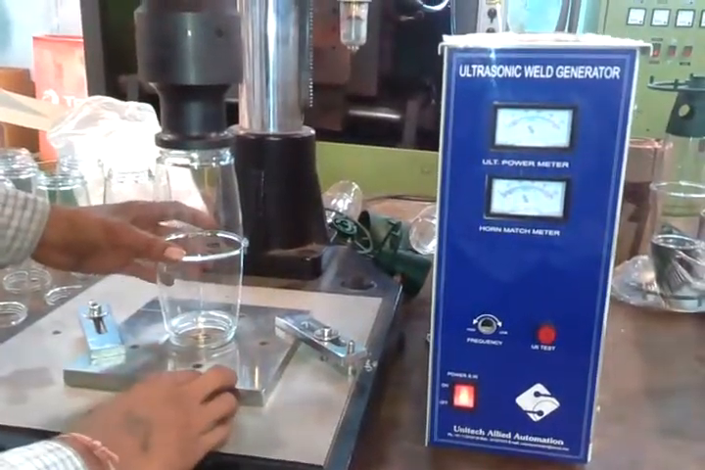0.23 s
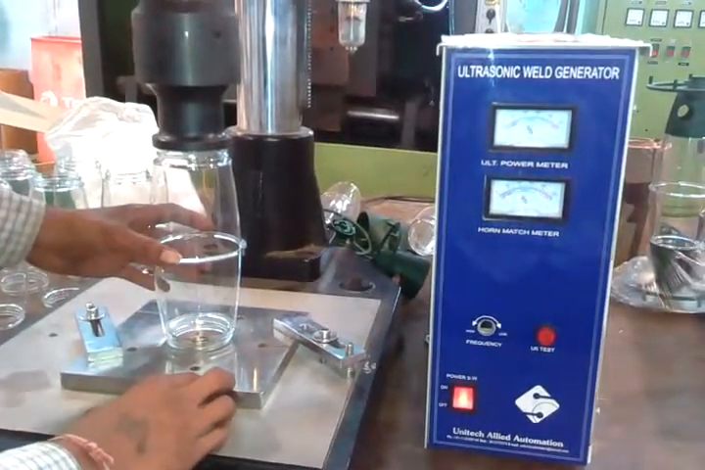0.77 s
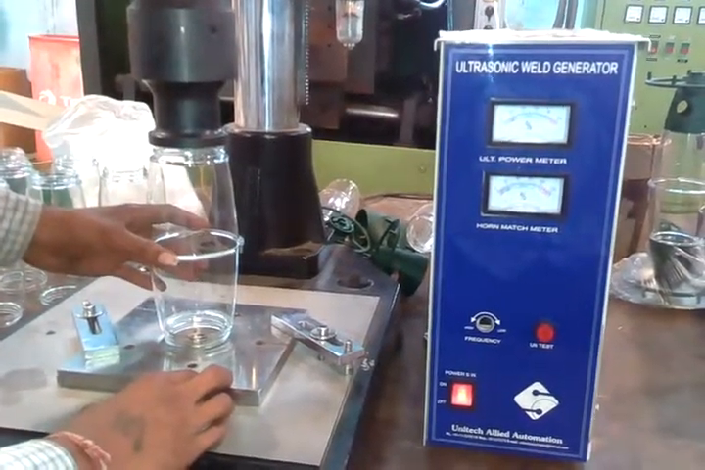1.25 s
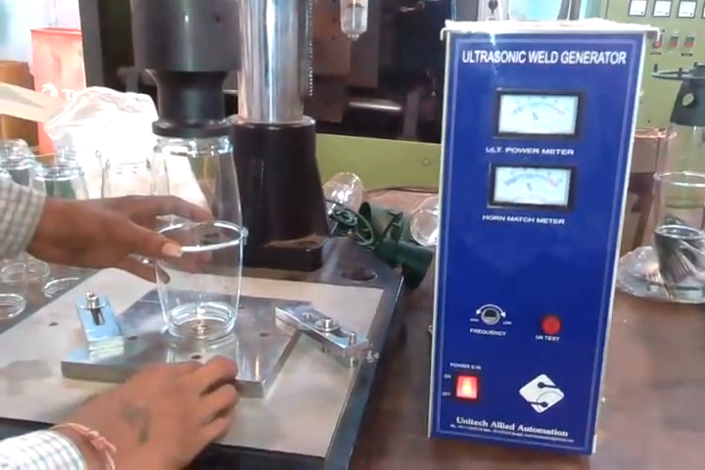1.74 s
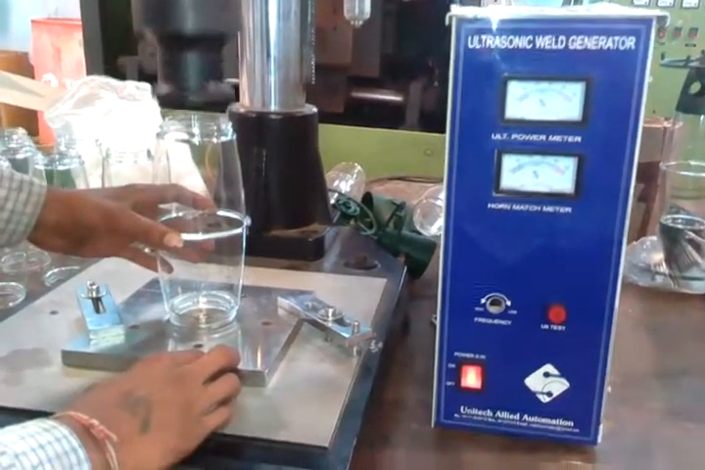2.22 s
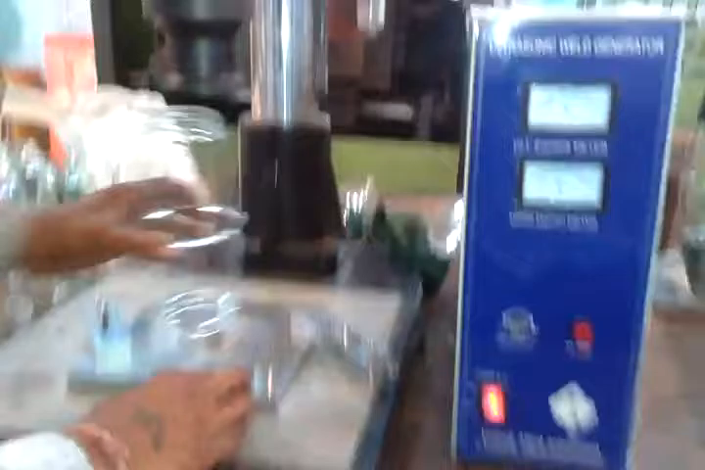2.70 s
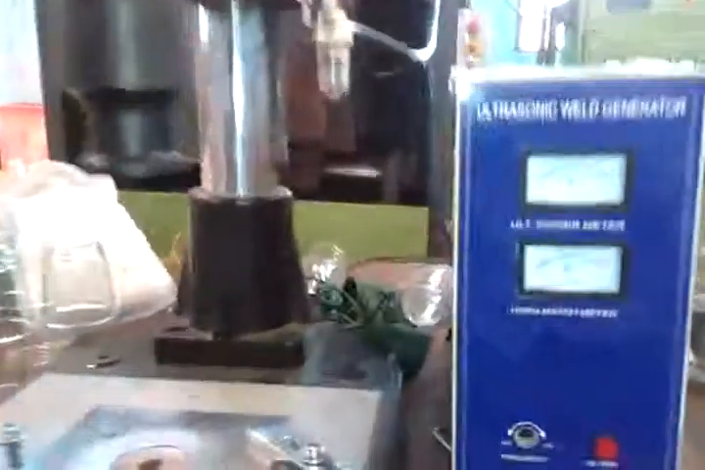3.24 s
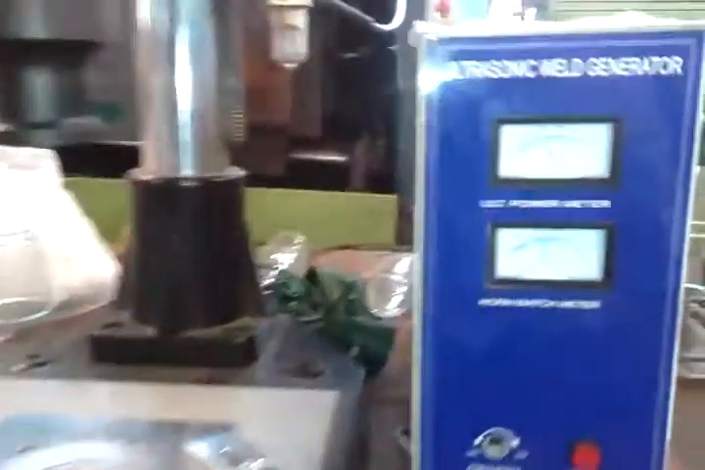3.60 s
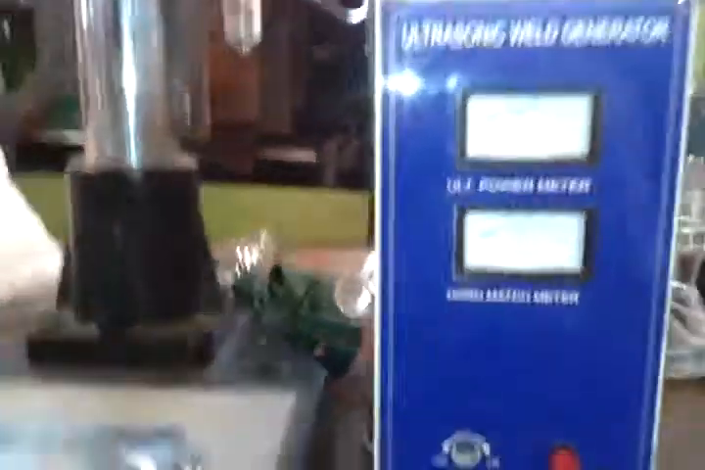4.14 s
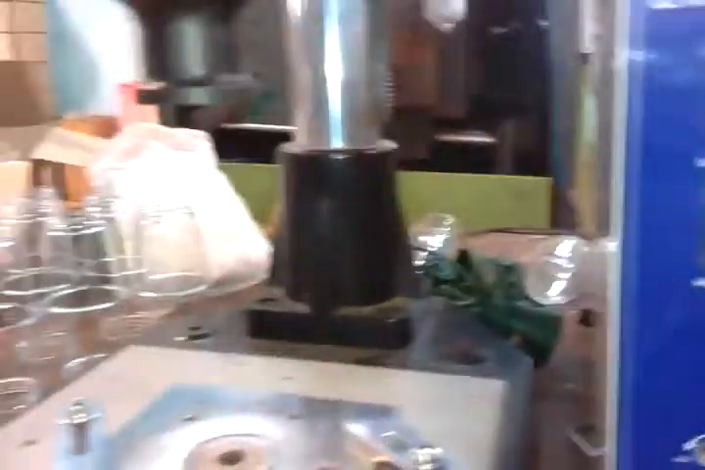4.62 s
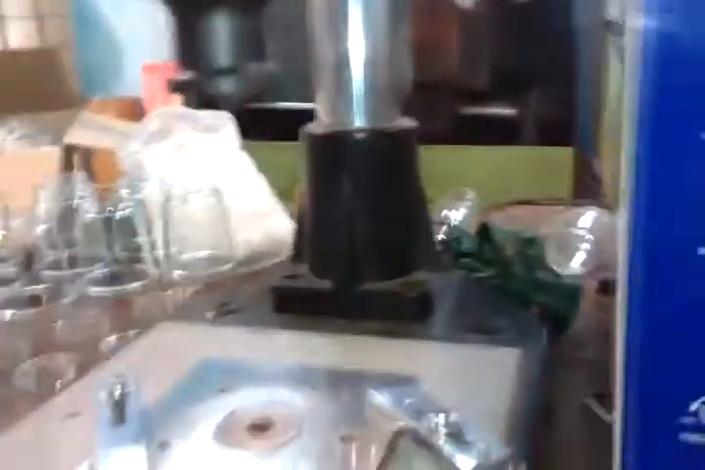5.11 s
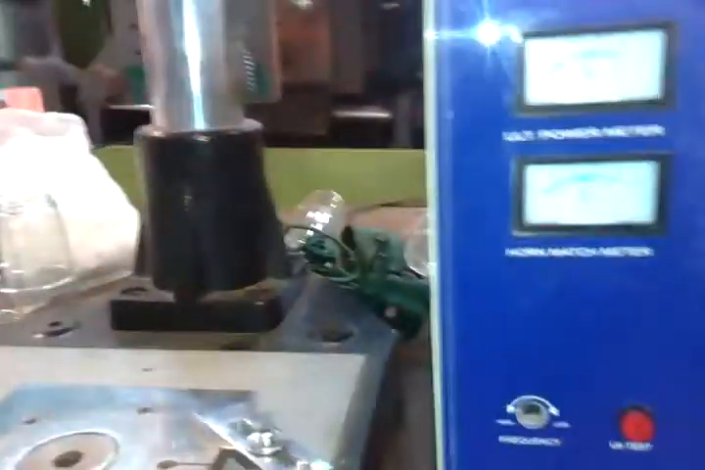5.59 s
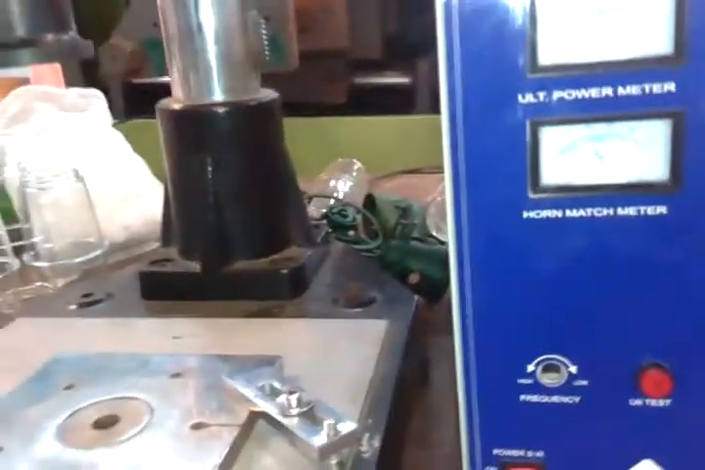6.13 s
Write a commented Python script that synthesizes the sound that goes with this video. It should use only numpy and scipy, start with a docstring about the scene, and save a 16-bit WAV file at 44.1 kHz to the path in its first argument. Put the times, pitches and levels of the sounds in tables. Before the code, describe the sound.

A harsh ultrasonic welder screech on a plastic jar ends in a ringing shriek, then air hisses, knocks, clinks, a sharp venting burst and short valve whistle.

```python
"""A harsh screech, a last shriek ringing out, then hisses, a knock, clinks, a venting rush and a whistle.
An ultrasonic press welds a plastic jar: uneven random hits make the rasp, wavering tones the squeal.
Pneumatics are shaped noise puffs; the lifted jar's knocks and clinks are decaying modes.
A valve whistles by gliding narrow-band noise; mains hum, fan, machines and workshop noise lie underneath.
The close microphone overloads on the loudest peaks."""
import sys
import numpy as np
from scipy import signal
from scipy.fft import rfft, irfft, next_fast_len
from scipy.io import wavfile
from scipy.ndimage import uniform_filter1d, map_coordinates

SR = 44100
rng = np.random.default_rng(int(sys.argv[2]) if len(sys.argv) > 2 else 0)


def log_audio(samples):
    """Write samples as a 16-bit WAV file to the path given in sys.argv[1]."""
    # one column per channel
    frames = np.atleast_2d(samples).T
    # limit to full scale, then quantise
    limited = np.clip(frames, -1, 1)
    pcm = np.round(limited * 32767).astype(np.int16)
    wavfile.write(sys.argv[1], SR, pcm)


N = 280035
TIME_S = np.arange(N) / SR

# rasp spectrum of the chattering horn: freq_hz, level_db
CHATTER_COLOUR = [(120, -48), (200, -13.5), (400, -11.5), (1500, -11), (4200, -10), (5100, -9),
                  (5600, -4.5), (8300, -2.5), (9800, -4), (10700, -8), (13000, -10.5), (17000, -11)]
# tones of the rattling jar, mostly multiples of its bounce rate: pitch_hz, width_hz, level_db
SQUEAL_TONES = [(1161, 18, -30), (2363, 204, -32.5), (3480, 197, -31.5), (4700, 140, -30.5),
                (5420, 113, -27), (5830, 71, -26), (6910, 70, -22), (7830, 30, -35), (7720, 35, -30),
                (8150, 55, -18.5), (8130, 43, -29), (9270, 69, -24.5), (10450, 26, -20.5), (11300, 55, -36),
                (16200, 190, -31)]
# tones of the closing shriek: pitch_hz, width_hz, level_db
SHRIEK_TONES = [(1139, 21.2, -19), (2284, 28.8, -25.5), (3456, 156, -27), (4510, 153, -20.5),
                (5760, 116, -22.5), (7050, 67, -30), (8180, 22.4, -16), (8900, 30, -25), (9340, 25, -13.5),
                (10330, 17, -17.5), (11800, 77, -32)]
# rasp spectrum of the shriek: freq_hz, level_db
SHRIEK_COLOUR = [(500, -14), (1700, -14.5), (2900, -11), (3900, -8.5), (4900, -2), (6000, 1), (8500, 1.5),
                 (9900, -1.5), (10900, -5), (12800, -14), (17000, -16)]
# decay of the hall: freq_hz, t60_s
HALL_DECAY = [(200, 0.75), (1100, 1.12), (3000, 1.21), (6000, 1.1), (9000, 0.87), (12000, 0.61),
              (16000, 0.29)]
# spectra of the air flows: freq_hz, density_db (per Hz)
HOLD_COLOUR = [(880, -40), (1500, -18), (1860, -6), (2160, -3.5), (3590, 1.5), (4060, -3), (5230, 1),
               (10400, -3), (17000, -17)]
LIFT_COLOUR = [(1500, -11), (2600, -1), (3300, 0), (4500, -6), (6000, 2), (7600, 0.5), (9500, -5),
               (11500, -1), (13000, -8), (17000, -9)]
EXHAUST_COLOUR = [(880, -42), (1500, -21), (2650, -12.5), (3310, -10.5), (4730, -9.5), (5850, -8.5),
                  (6410, -7), (10100, -7.5), (11300, -11.5), (13900, -19.5), (16500, -23), (17000, -26)]
BLEED_COLOUR = [(1500, -20), (2500, -7), (3700, -5), (5200, -7.5), (6500, -1), (9300, -1), (11500, -8),
                (14000, -11), (17000, -14.5)]
# air holding the horn down: start_s, attack_s, hold_s, fall_db_per_s, rush_db, fizz_db
HOLD_PUFFS = [(1.12, 0.043, 0.11, 46, -28, -29.5), (1.485, .015, .015, 65, -33.5, -40)]
# faint leak, then the stroke lifting the horn: start_s, attack_s, hold_s, fall_db_per_s, rush_db, fizz_db
LIFT_PUFFS = [(1.81, 0.04, 0.091, 40, -42, -50.5), (1.979, 0.012, 0.28, 32, -31, -33.5)]
# cylinder venting in surges: start_s, attack_s, hold_s, fall_db_per_s, rush_db, fizz_db
EXHAUST_PUFFS = [(3.04, 0.023, .01, 60, -50, -23), (3.06, 0.014, .04, 28.5, -21, -10.5),
                 (3.43, 0.035, 0.15, 26, -38, -26.5), (3.72, 0.21, 0.35, 37, -43, -32),
                 (4.225, .07, .015, 40, -27.5, -42)]
# air bleeding from the lines: start_s, attack_s, hold_s, fall_db_per_s, rush_db, fizz_db
BLEED_PUFFS = [(2.73, 0.049, 0.37, 58, -46, -44), (4.67, 0.12, 0.23, 17, -33, -36),
               (5.2, 0.14, 0.17, 31, -40, -38.5), (5.75, 0.11, 0.46, 30, -40.5, -45)]
# resonances of the return valve's passage: centre_hz, width_hz, level_db (re the flow)
PASSAGE_MODES = [(3140, 320, -7.5), (3860, 150, -9), (5670, 100, -5.5), (7150, 260, -4.5),
                 (8140, 150, -1.5), (9100, 120, -9), (10560, 200, -11), (11080, 200, -10),
                 (11540, 130, -10), (12020, 130, -13)]
# singing of the exhaust pipe: start_s, attack_s, hold_s, fall_db_per_s, level_db
PIPE_NOTES = [(3.1, .1, 0.58, 40, -39.5), (4.29, 0.051, .015, 110, -37), (4.45, 0.032, .015, 65.5, -39),
              (4.735, .035, .015, 52, -31.5)]
# upper tones of the whistling valve: centre_hz, width_hz, level_db, delay_s
WHISTLE_OVERTONES = [(11240, 35, -11, -.04), (11450, 2400, -7.5, -.07), (12260, 120, -21, -.06),
                     (12440, 450, -9.5, 0.054), (13350, 400, -18, -.03), (14300, 160, -26, -.09)]
# blows as the jar is lifted, and light taps on it: start_s, level_db, sharpness_hz (contact low-pass)
CLINKS = [(2.8205, -18, 10000), (2.8235, -24, 7000), (2.844, -17, 5000), (2.848, -31, 5000)]
KNOCKS = [(2.691, -26, 900), (2.724, -17.5, 1800), (2.741, -16.5, 260), (2.749, -16, 260)]
TAPS = [(2.08, -26.5, 4000), (5.842, -37, 6000)]
# ringing modes of the struck bodies: pitch_hz, level_db, t60_s
STEEL_MODES = [(2200, -15, 0.073), (3310, -5.5, 0.072), (4130, -10, 0.055), (4850, -15, 0.031),
               (5400, -9, 0.03), (6500, -7, .035), (6970, -10, .035), (7750, -11, 0.028)]
BENCH_MODES = [(126, -1.5, 0.12), (163, -10, 0.044), (265, -7.5, 0.045), (390, -4, 0.063), (545, 2, 0.038),
               (714, -5, 0.04), (1300, -8, .03)]
JAR_MODES = [(1063, 4, 0.072), (1180, 2, 0.062), (2140, 0, 0.048), (2770, -8, .05)]
# mains hum: time_s, level_db
HUM_LEVEL = [(0, -46), (.98, -38.5), (1.06, -32), (1.25, -38.5), (1.9, -37.5), (2.95, -29.5), (4.6, -38),
             (5.4, -40.5), (5.6, -33.5), (6.35, -34)]
# whine of the generator's fan: time_s, level_db
FAN_LEVEL = [(0, -47), (3.2, -50), (3.6, -43.5), (6.35, -47)]
# other machines: centre_hz, width_hz, level_db
MOTOR_BANDS = [(134.3, 18, -52), (172.7, 5.9, -44), (218.4, 4.4, -48), (280.4, 6.5, -48.5), (683, 67, -47),
               (779, 46, -47.5)]
# distant rushing that comes and goes: start_s, attack_s, hold_s, fall_db_per_s, level_db
DISTANT_SWELLS = [(1.4, 0.13, .03, 21, -41), (3.35, 0.25, .03, 36, -32), (3.8, 0.16, 0.55, 12, -38)]
# workshop noise spectrum: freq_hz, density_db (per Hz)
FLOOR_COLOUR = [(20, 0), (45, -5), (85, 1.5), (170, -1), (300, -3.5), (500, -6), (800, -9), (1300, -12),
                (2200, -17), (4000, -21), (7000, -22.5), (10000, -25), (13000, -37), (17000, -39)]

WELD_END_S, SHRIEK_START_S, SHRIEK_END_S = 0.579, 0.597, 0.66
WELD_DB, WELD_SAG_DB_PER_S = -6.5, 6  # the chatter eases as the plastic softens
GRIP_RATE_HZ = 20.6  # changes a second in the horn's contact
FIZZ_FALL_RATIO = 1.7  # fizz falls this much faster than rush
RUSH_LAG_S = 0.012  # extra attack time of the rush
WHISTLE_PEAK_S, WHISTLE_DB = 4.97, -14.5
WHISTLE_RISE_DB_PER_S, WHISTLE_FALL_DB_PER_S = 260, 52
WHISTLE_END_HZ, WHISTLE_EXCESS_HZ, WHISTLE_GLIDE_S = 9250, 297.6, 0.08  # excess pitch at the peak
HUM_HZ, FAN_HZ = 99.1, 814
ROOM_DB, ROOM_DUCK_DB = -30.5, -3.5  # lower during the weld
TOP_HZ = 17250  # microphone band limit


def weld(rasp_db=-1.5, squeal_db=-0.5, hits_hz=3400, smear=0.3):
    """The horn strikes the plastic thousands of times a second, unevenly, and the jar squeals."""
    hit_sizes = rng.choice([-1, 1], N) * amp(1.7 * rng.standard_normal(N))
    hits = (rng.random(N) < hits_hz / SR) * hit_sizes
    rasp = unit(filtered(hits, lambda hz: amp(along(CHATTER_COLOUR, hz))))
    # the room blurs part of the hits
    rasp = patchy(rasp + smear * noise(CHATTER_COLOUR), depth_db=0.13)
    squeal = sum(amp(db) * echoing(hz, width_hz, scatter=0.61) for hz, width_hz, db in SQUEAL_TONES)
    chatter_db = WELD_DB - WELD_SAG_DB_PER_S * TIME_S + wobble(GRIP_RATE_HZ)
    grip_db = wobble(GRIP_RATE_HZ)
    screech = amp(chatter_db + rasp_db) * rasp + amp(grip_db + squeal_db) * squeal
    # nearby reflections outlast the horn
    afterglow = amp(-7 - 60 * np.maximum(TIME_S - WELD_END_S, 0) / 0.13)
    return screech * np.maximum(gate(0, WELD_END_S, edge_s=0.005), afterglow)


def shriek(rasp_db=-8.5, lull_db=-11):
    """After a brief lull a last shriek fills the hall and dies away, treble first."""
    rasp = patchy(noise(SHRIEK_COLOUR), depth_db=2.5) * amp(rasp_db + 0.58 * wobble(58.8))
    tones = sum(amp(db) * echoing(hz, width_hz, scatter=1.0) for hz, width_hz, db in SHRIEK_TONES)
    hz, frame_s, spectrum = signal.stft(rasp + tones, SR, nperseg=512)
    fade_db = -60 * np.maximum(frame_s - SHRIEK_END_S, 0) / along(HALL_DECAY, hz)[:, None]
    ringing = signal.istft(spectrum * amp(fade_db), SR, nperseg=512)[1][:N]
    lull = amp(lull_db) * gate(WELD_END_S, np.inf, edge_s=0.005)
    return ringing * np.maximum(lull, gate(SHRIEK_START_S, np.inf, edge_s=0.0019))


def pneumatics(passage_db=-2.0):
    """Air holds the horn down, lifts it through a ringing valve passage, vents and bleeds away."""
    hold = jet(HOLD_PUFFS, HOLD_COLOUR, rush_db=-2.5, fizz_db=-4.5, flutter_db=0.5)
    lift = jet(LIFT_PUFFS, LIFT_COLOUR, rush_db=-5.5, fizz_db=-2, flutter_db=1.0)
    modes = sum(amp(db + passage_db) * band(hz, width_hz / 2) for hz, width_hz, db in PASSAGE_MODES)
    passage = flow(LIFT_PUFFS)[1] * modes
    vent = jet(EXHAUST_PUFFS, EXHAUST_COLOUR, rush_db=-2.64, fizz_db=-1.5, flutter_db=0.0)
    bleed = jet(BLEED_PUFFS, BLEED_COLOUR, rush_db=-0.1, fizz_db=2.5, flutter_db=0.55)
    pipe = swells(PIPE_NOTES) * band(3600, half_width_hz=680)
    return hold + lift + passage + vent + bleed + pipe


def jet(puffs, colour, rush_db, fizz_db, flutter_db):
    """Turbulent air at an orifice: low rush and high fizz, the fizz dying faster."""
    rush_gain, fizz_gain = flow(puffs)
    air = patchy(noise(colour), depth_db=1.5)
    rush = filtered(air, lambda hz: 1 / (1 + (hz / 8000) ** 8))
    fizz = air - rush
    hiss = amp(rush_db) * rush_gain * unit(rush) + amp(fizz_db) * fizz_gain * unit(fizz)
    return hiss * amp(flutter_db * wobble(35))


def flow(puffs):
    """Gains of the low rush and the high fizz of a series of puffs."""
    rush = swells([(s, attack_s + RUSH_LAG_S, hold_s, fall, rush_db)
                   for s, attack_s, hold_s, fall, rush_db, _ in puffs])
    fizz = swells([(s, attack_s, hold_s, fall * FIZZ_FALL_RATIO, fizz_db)
                   for s, attack_s, hold_s, fall, _, fizz_db in puffs])
    return rush, fizz


def whistle(edge_db=-3.5, core_db=-8, core_hz=9115):
    """Falling pressure sinks a breathy edge tone towards the valve's resonance; tones peak in turn."""
    def blown(db, delay_s):
        t = TIME_S - WHISTLE_PEAK_S - delay_s
        slope_db = np.minimum(WHISTLE_RISE_DB_PER_S * t, -WHISTLE_FALL_DB_PER_S * t)
        return amp(WHISTLE_DB + db + slope_db)

    glide = 1 - np.tanh((TIME_S - WHISTLE_PEAK_S) / WHISTLE_GLIDE_S)
    pitch_hz = WHISTLE_END_HZ + WHISTLE_EXCESS_HZ * glide
    # shift a noise band along the glide
    shift = np.exp(2j * np.pi * np.cumsum(pitch_hz - core_hz) / SR)
    breathy = (signal.hilbert(band(core_hz, half_width_hz=190)) * shift).real
    core = blown(core_db, 0.05) * tone(core_hz, 20, flutter_db=2.0)
    upper = sum(blown(db, delay_s) * band(hz, width_hz / 2)
                for hz, width_hz, db, delay_s in WHISTLE_OVERTONES)
    return blown(edge_db, 0) * breathy + core + upper


def handling():
    """The jar is tapped, knocks the bench and clinks on the steel fixture."""
    taps = struck(TAPS, JAR_MODES, crack=0.2)
    knocks = struck(KNOCKS, BENCH_MODES, crack=0.06)
    clinks = struck(CLINKS, STEEL_MODES, crack=0.76)
    return taps + knocks + clinks


def struck(blows, modes, crack):
    """Each blow rings the modes at new strengths with a brief crack; soft contact dulls both."""
    out, t = np.zeros(N), TIME_S[:SR // 4]
    for start_s, db, sharpness_hz in blows:
        ring = 0
        for hz, mode_db, t60_s in modes:
            decay = amp(mode_db + rng.normal(0, 2.6) - 60 * t / t60_s)
            ring = ring + decay * np.sin(2 * np.pi * (hz * t + rng.random()))
        snap = crack * amp(-60 * t / 0.036) * rng.standard_normal(len(t))
        blow = (ring + snap) * (1 - np.exp(-t / 0.0011))
        b, a = signal.butter(2, sharpness_hz, fs=SR)
        out[round(start_s * SR):][:len(t)] += amp(db) * signal.lfilter(b, a, blow)
    return out


def workshop(hum_db=-1, motors_db=-1.5):
    """Transformer hum and a cooling fan over the wash of distant machines."""
    hum = amp(level_curve(HUM_LEVEL) + hum_db) * tone(HUM_HZ, 0.71, flutter_db=1.0)
    fan = amp(level_curve(FAN_LEVEL)) * tone(FAN_HZ, 4.25, flutter_db=4.0)
    motors = sum(amp(db + motors_db) * band(hz, width_hz / 2) for hz, width_hz, db in MOTOR_BANDS)
    distant = swells(DISTANT_SWELLS) * band(1150, half_width_hz=1500)
    room_db = ROOM_DB + ROOM_DUCK_DB * gate(0, WELD_END_S, edge_s=0.34)
    wash = amp(room_db) * patchy(noise(FLOOR_COLOUR), depth_db=2.04)
    return hum + fan + motors + distant + wash


def echoing(hz, width_hz, scatter):
    """A wavering tone beating against its own reflections, modelled as a noise band."""
    return unit(tone(hz, width_hz, flutter_db=4.0) + scatter * band(hz, width_hz))


def tone(hz, width_hz, flutter_db):
    """A self-sustained tone whose pitch and strength waver."""
    pitch_hz = hz + width_hz / 2 * wobble(120)
    return unit(amp(flutter_db * wobble(27.98)) * np.sin(2 * np.pi * np.cumsum(pitch_hz) / SR))


def band(centre_hz, half_width_hz):
    """Noise of rms 1 ringing in one resonance."""
    def resonance(hz):
        return 1 / (1 + 1j * (hz - centre_hz) / half_width_hz) ** 2
    return unit(filtered(rng.standard_normal(N), resonance))


def noise(colour):
    """Noise of rms 1 with a given spectrum."""
    return unit(filtered(rng.standard_normal(N), lambda hz: amp(along(colour, hz))))


def patchy(x, depth_db):
    """Uneven noise: random patches of time and frequency are made louder or softer."""
    spectrum = signal.stft(x, nperseg=1024)[2]
    field = uniform_filter1d(rng.standard_normal(spectrum.shape), 3, axis=0)
    field = uniform_filter1d(field, 24, axis=1)
    return unit(signal.istft(spectrum * amp(depth_db * unit(field)), nperseg=1024)[1][:N])


def swell(start_s, attack_s, hold_s, fall_db_per_s):
    """A gain that rises evenly, holds, then falls by so many dB a second."""
    t = TIME_S - start_s
    return np.clip(t / attack_s, 0, 1) * amp(-fall_db_per_s * np.maximum(t - attack_s - hold_s, 0))


def swells(rows):
    """Joint gain of overlapping swells of noise, whose powers add."""
    return np.sqrt(sum((amp(db) * swell(*shape)) ** 2 for *shape, db in rows))


def gate(start_s, end_s, edge_s):
    """1 between two times, with linear edges outside them."""
    opening = np.clip((TIME_S - start_s) / edge_s + 1, 0, 1)
    return opening * np.clip((end_s - TIME_S) / edge_s + 1, 0, 1)


def wobble(rate_hz):
    """A smooth random curve, rate_hz knots a second."""
    knots = rng.standard_normal(int(N * rate_hz / SR) + 4)
    return map_coordinates(knots, [TIME_S * rate_hz])


def level_curve(rows):
    """Level in dB per sample, linear between the points."""
    return np.interp(TIME_S, *np.transpose(rows))


def along(points, hz):
    """Interpolate (freq_hz, value) points on a log frequency axis."""
    freq_hz, values = np.transpose(points)
    return np.interp(np.log(hz + 1), np.log(freq_hz + 1), values)


def filtered(x, response):
    """x times a response of frequency, zero-padded."""
    size = next_fast_len(N + SR // 2)
    return irfft(rfft(x, size) * response(np.fft.rfftfreq(size, 1 / SR)), size)[:N]


def amp(db):
    """Decibels to gain."""
    return 10 ** (np.asarray(db) / 20)


def unit(x):
    """Scale to rms 1."""
    return x / np.sqrt(np.mean(x ** 2) + 1e-20)


def scene():
    """All sources at one microphone."""
    return (weld() + shriek() + pneumatics() + whistle() + handling() + workshop())[None]


def record(dry, ceiling=0.84):
    """The microphone rounds off the loudest peaks and keeps nothing above its band limit."""
    clipped = dry[0] / (1 + np.abs(dry[0] / ceiling) ** 6) ** (1 / 6)
    return filtered(clipped, lambda hz: hz < TOP_HZ)[None]


dry = scene()
out = record(dry)
log_audio(out)
```